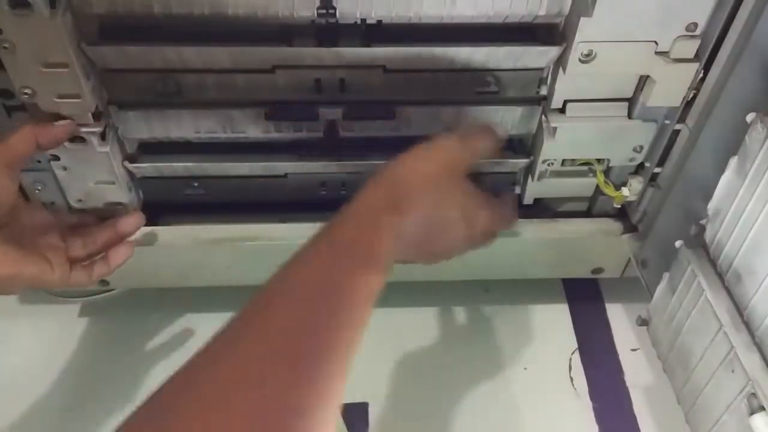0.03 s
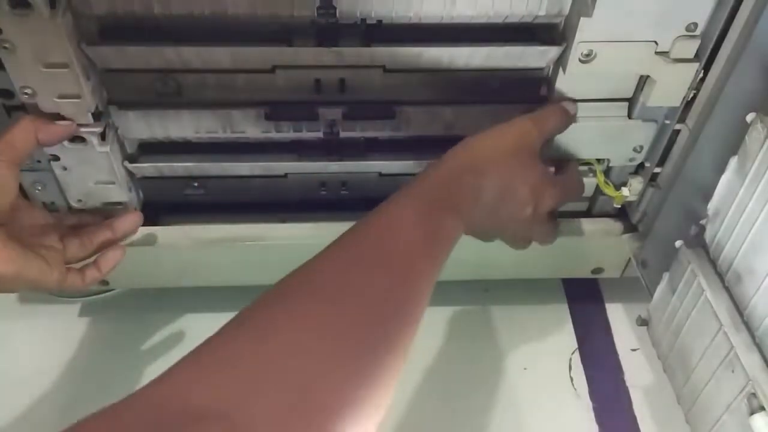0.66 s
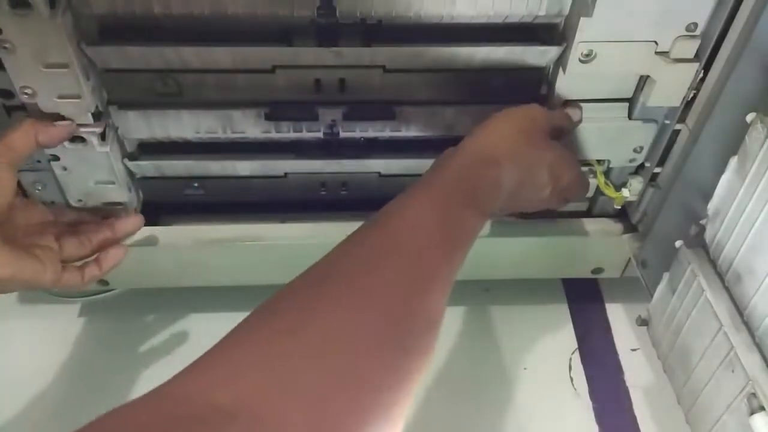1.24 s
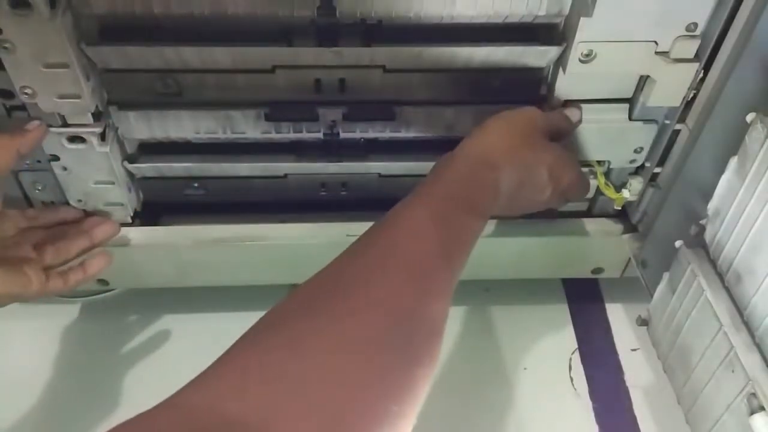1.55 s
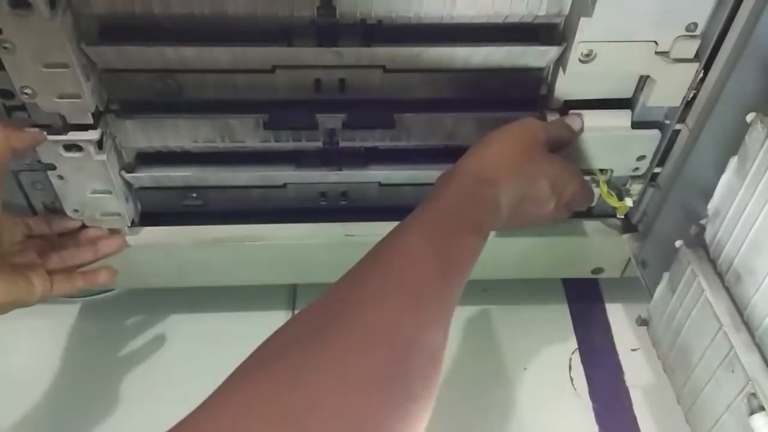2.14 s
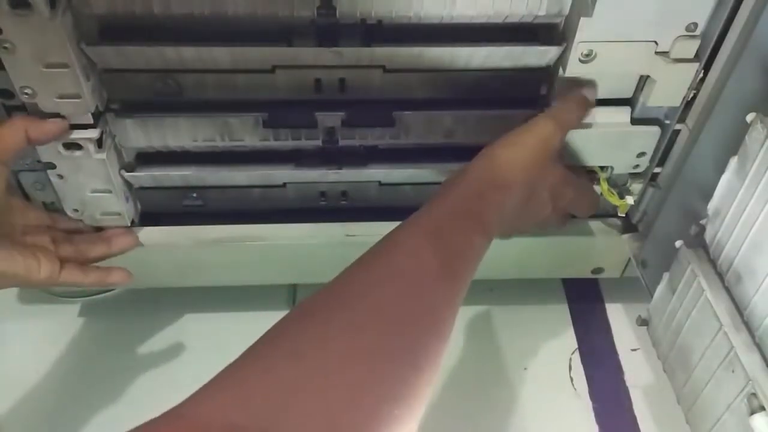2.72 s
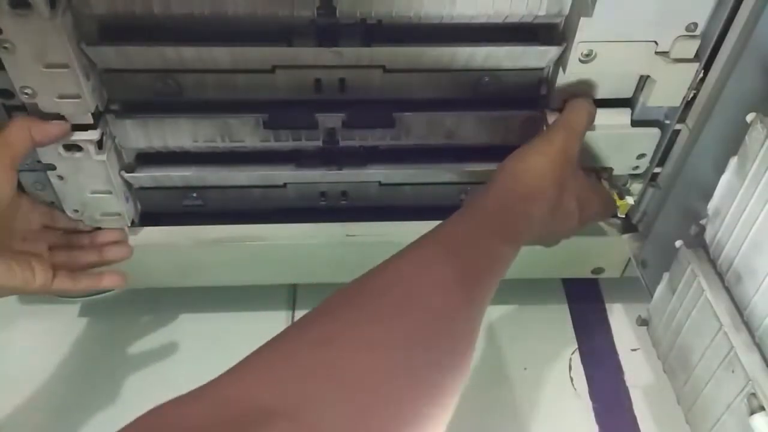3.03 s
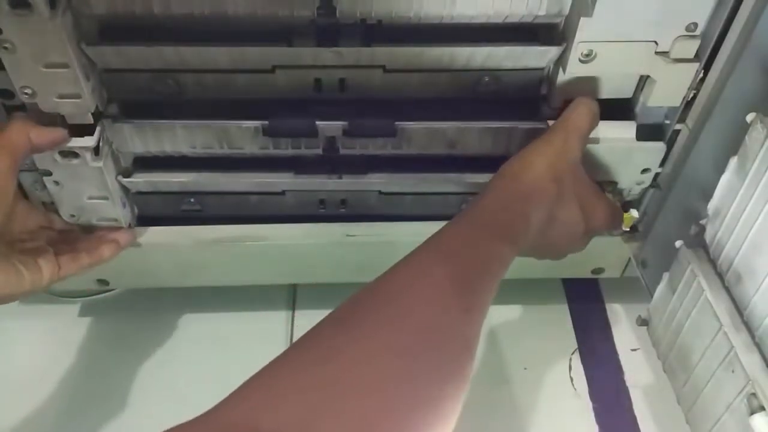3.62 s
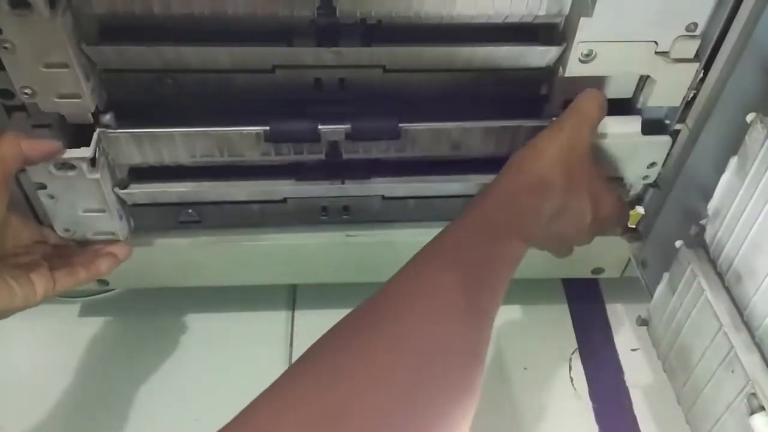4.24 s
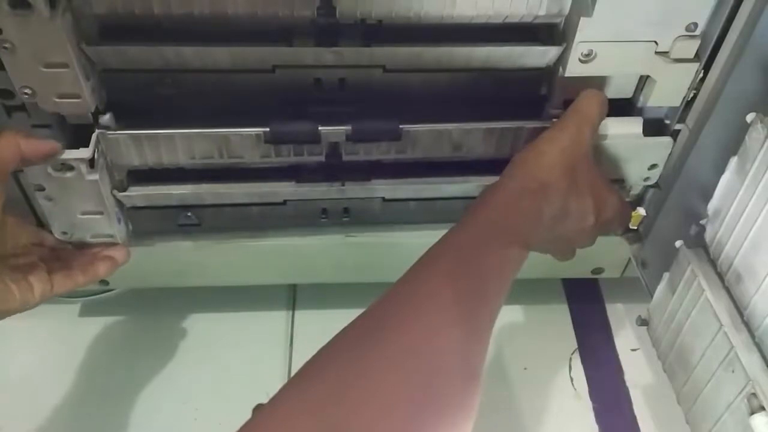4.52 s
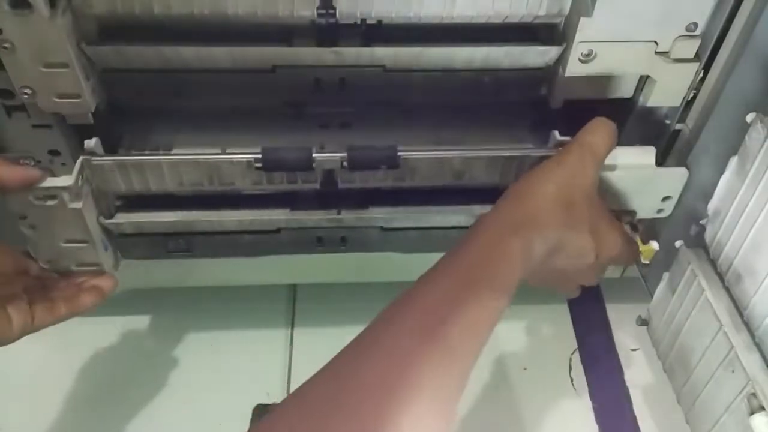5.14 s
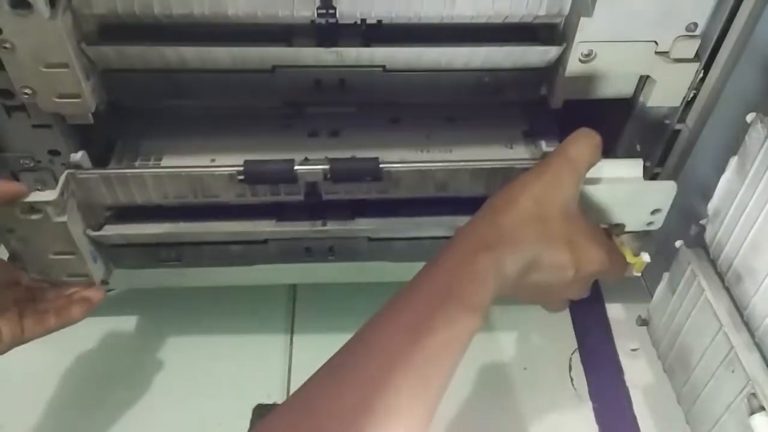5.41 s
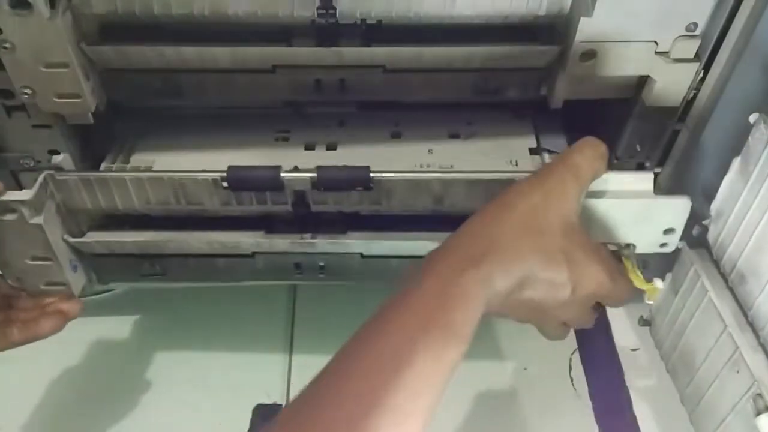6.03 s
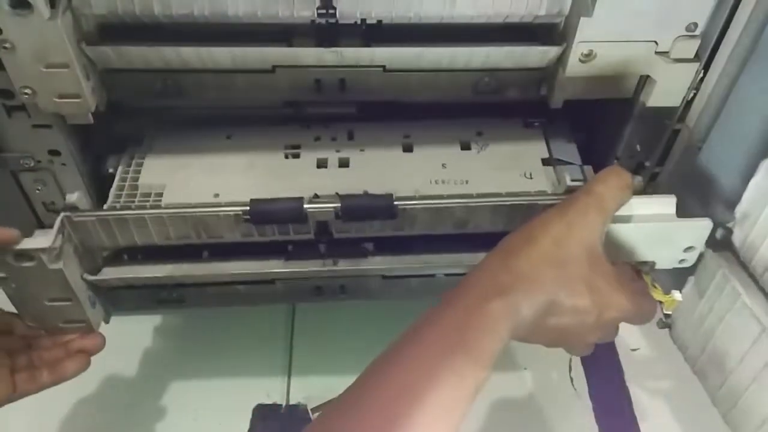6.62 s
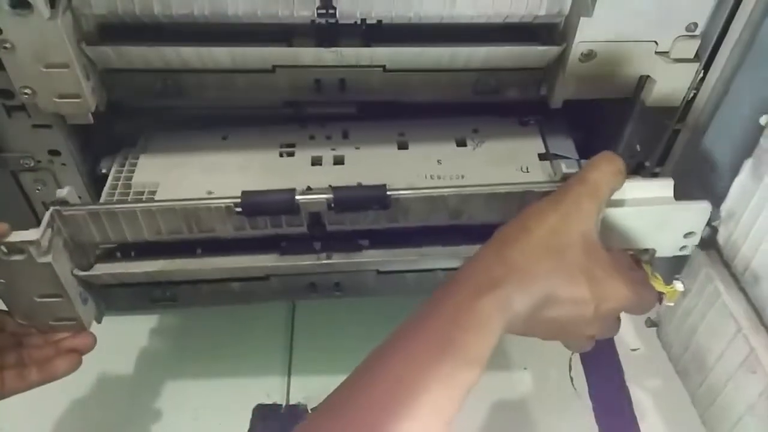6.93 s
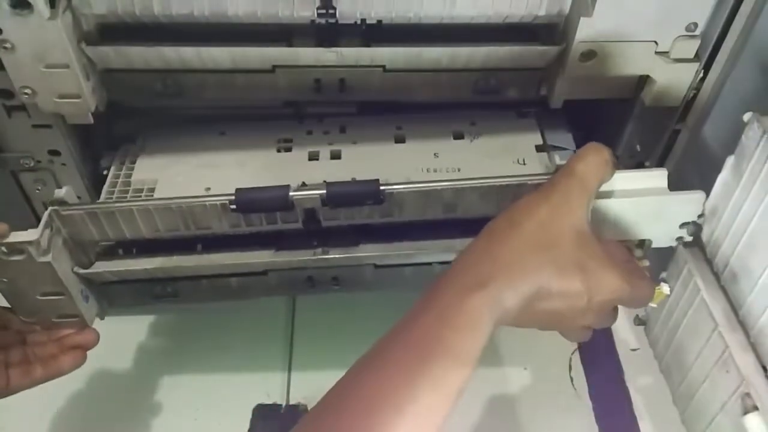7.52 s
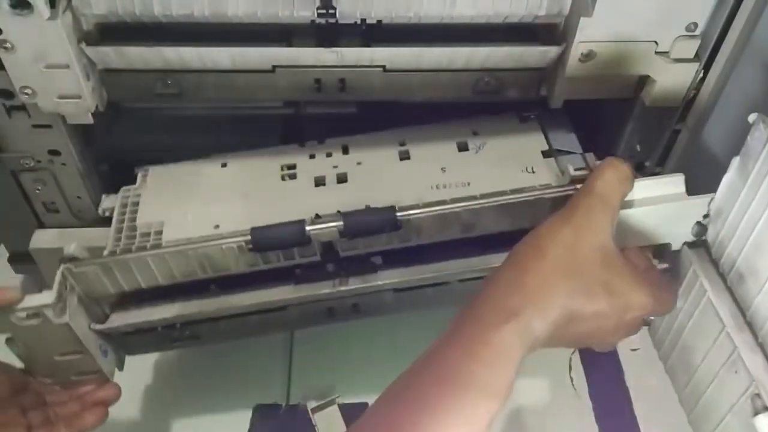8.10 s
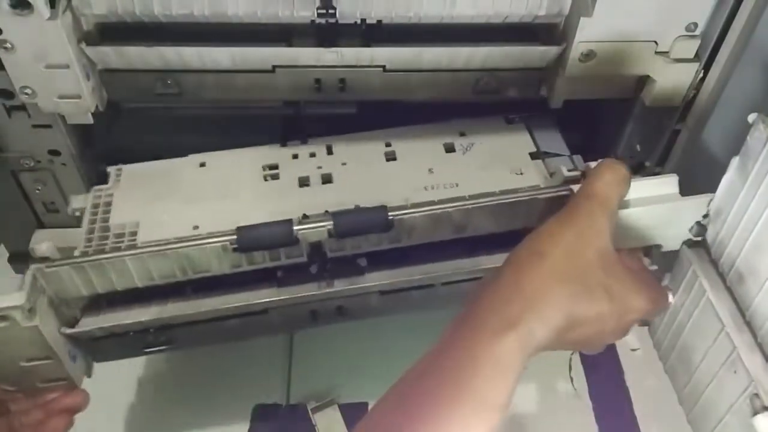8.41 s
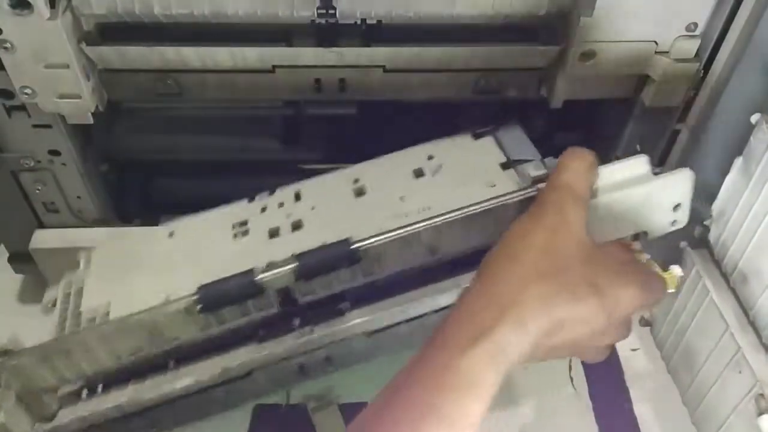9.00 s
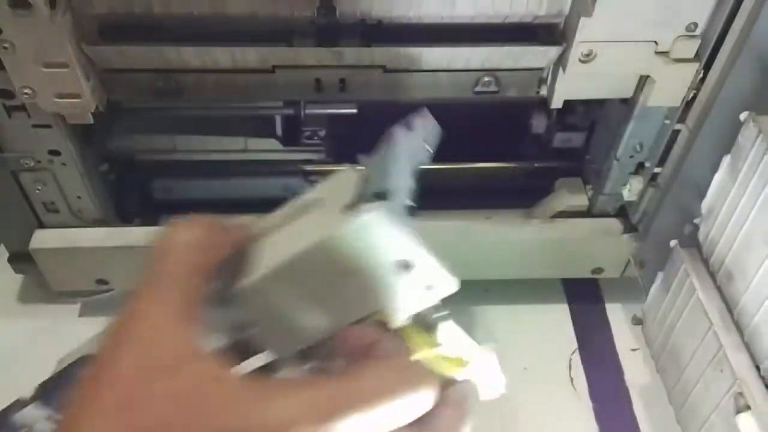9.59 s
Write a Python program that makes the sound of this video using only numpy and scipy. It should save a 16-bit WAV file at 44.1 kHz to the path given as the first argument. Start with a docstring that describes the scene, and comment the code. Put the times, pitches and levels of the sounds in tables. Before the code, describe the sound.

In a small hard room, hands unlatch a photocopier's paper feed unit with sharp plastic snaps. The unit judders along its rails, knocking against plastic panels and a steel frame that rings briefly, with small squeaks between the knocks. The clatter grows busier and hollower as the unit comes loose. Out in the street a motor vehicle draws near and passes toward the end. The handling is heard close, in stereo.

```python
"""Plastic catches snap close by in a small hard room: two hands unlatch a photocopier's paper feed unit.
Worked out of the open machine, the unit judders along its rails and knocks the panels and the steel
frame, which rings longest as the unit comes free. Between the knocks, guides stick, slip and squeak.
Out in the street a motor vehicle draws near and passes, with engine note, rumble and tyre hiss.
Heard on a closely spaced pair of microphones."""
import sys
import numpy as np
from scipy import signal
from scipy.fft import rfft, irfft
from scipy.io import wavfile

SR = 44100
rng = np.random.default_rng(int(sys.argv[2]) if len(sys.argv) > 2 else 0)


def write(x):
    x = np.atleast_2d(x).T
    wavfile.write(sys.argv[1], SR, np.round(np.clip(x, -1, 1) * 32767).astype(np.int16))


N = 429975
TIME = np.arange(N) / SR
HIT_SIZE = SR * 6 // 10
BAND_EDGES_HZ = np.concatenate([[25, 60, 105], np.geomspace(145, 17000, 28)])
BANDS_HZ = np.sqrt(BAND_EDGES_HZ[1:] * BAND_EDGES_HZ[:-1])


def from_db(db):
    return 10 ** (np.asarray(db) / 20)


def rms_one(x):
    return x / np.sqrt(np.mean(x ** 2) + 1e-20)


def at_time(rows, s):
    """Every column of a curve, read at the given times."""
    times, *columns = np.transpose(rows)
    return [np.interp(s, times, c) for c in columns]


def by_band(points):
    """A spectrum read at the band centres."""
    hz, value = np.transpose(points)
    return np.interp(np.log(BANDS_HZ), np.log(hz), value)


def drift(per_s):
    """A random wander; rms 1."""
    knots = rng.standard_normal(4000)
    return rms_one(np.interp(TIME * per_s, np.arange(len(knots)), knots))


# Colour of the left microphone against the right: frequency_hz, left_minus_right_db
MIC_TILT = [(60, 46.5), (150, -2.5), (500, -2.5), (1000, -0.5), (2000, -1), (4200, 3), (8000, 6.5),
            (13000, -1)]

def diffuse_bands(size, mic_spacing_s=0.00044):
    """Diffuse noise at the spaced pair, alike in the bass only: bands x 2 x size."""
    white, bands = rng.standard_normal((2, 2, size)), []
    for k, (hz, tilt_db) in enumerate(zip(BANDS_HZ, by_band(MIC_TILT))):
        bandpass = signal.butter(3, BAND_EDGES_HZ[k:k + 2], "band", fs=SR, output="sos")
        mid, side = signal.sosfilt(bandpass, white[k % 2])
        alike = np.sinc(2 * hz * mic_spacing_s)
        pair = np.sqrt(1 + alike) * mid + np.sqrt(1 - alike) * side * [[1], [-1]]
        bands.append(pair * from_db([[tilt_db / 2], [-tilt_db / 2]]))
    return np.array(bands, dtype=np.float32)


def coloured(bands, spectrum):
    """The bands mixed to a spectrum; rms 1."""
    return rms_one(np.tensordot(from_db(by_band(spectrum)).astype(np.float32), bands, 1))


# Room tone, all around the microphones: frequency_hz, density_db
ROOM_TONE = [(30, -42), (105, -51), (150, -2.5), (200, -7.5), (285, 1), (370, -4.5), (520, -12.5),
             (800, -15.5), (1300, -12), (2800, -18.5), (3800, -14), (4800, -19), (6100, -0.5), (7000, -21),
             (8400, -19), (13000, -19), (16000, -21)]

def room_air(bands, level_db=-53.5):
    """The steady air of the small room."""
    return from_db(level_db) * coloured(bands, ROOM_TONE)


# The engine's note as it reaches the room: time_s, level_db
ENGINE_LEVEL = [(0, -67), (3.0, -63.5), (4.6, -55.5), (7.7, -44), (8.6, -43), (9.7, -31.5)]
# Its partials: cycle_multiple, gain_db
ENGINE_ORDERS = [(4, -13), (5, -5.5), (6, -15.5), (8, -13.5)]

def engine(doppler, cycle_hz=44.4, wander=0.00412, waver_db=2.5):
    """Wavering harmonics of the engine cycle, sinking in pitch as the vehicle passes."""
    level_db, = at_time(ENGINE_LEVEL, TIME)
    phase = 2 * np.pi * np.cumsum(cycle_hz * doppler * (1 + wander * drift(8.4))) / SR
    return sum(from_db(level_db + db + waver_db * drift(4.8)) * np.sqrt(2) * np.sin(k * phase)
               for k, db in ENGINE_ORDERS)


# Rumble and tyres from the street, heard indoors: frequency_hz, density_db
RUMBLE_SPECTRUM = [(30, -55), (100, -32), (180, 2), (280, 6.5), (450, 6.5), (900, -8), (2500, -22.5)]
TYRE_SPECTRUM = [(100, -59), (250, -33), (550, -3.5), (1000, -4), (2800, -9.5), (4200, -13.5), (6500, -15),
                 (9000, -28.5), (16000, -38)]

def vehicle(bands, pass_s=8.9, speed_m_per_s=11, nearest_m=7.74, screen_db_per_m=0.5):
    """A steady drive past, louder and brighter up close; buildings screen it further up the street."""
    along_m = speed_m_per_s * (TIME - pass_s)
    distance_m = np.hypot(nearest_m, along_m)
    near_db = 20 * np.log10(nearest_m / distance_m) - screen_db_per_m * (distance_m - nearest_m)
    doppler = 1 / (1 + speed_m_per_s * along_m / distance_m / 343)
    note = engine(doppler)
    rumble = from_db(-38 + near_db) * np.roll(coloured(bands, RUMBLE_SPECTRUM), N // 3, axis=1)
    tyre_db = -33.5 + near_db + 0.9 * drift(22)
    tyres = from_db(tyre_db) * np.roll(coloured(bands, TYRE_SPECTRUM), N // 2, axis=1)
    roar = signal.sosfiltfilt(signal.butter(4, 3400, fs=SR, output="sos"), tyres)
    hiss = (tyres - roar) * from_db(0.24 * near_db)   # fades faster with distance
    return note + rumble + roar + hiss


# Guides rubbing inside the copier: start_s, length_s, pitch_hz, width_hz, rise_share, level_db
GUIDE_SQUEAKS = [(1.095, .086, 5650, 490, 0.025, -45.5), (1.978, 0.046, 418, 90, .02, -43),
                 (2.674, 0.055, 1680, 170, 0.014, -51.5), (3.354, 0.11, 1007, 300, 0.041, -45.5),
                 (4.44, 0.058, 3100, 130, .02, -51), (4.528, 0.028, 2440, 220, 0.036, -48),
                 (4.544, 0.041, 2880, 200, .03, -50), (4.587, 0.04, 3280, 190, 0.03, -50),
                 (4.565, 0.088, 1810, 400, 0.047, -50.5), (4.874, 0.27, 3340, 120, .02, -57.5),
                 (5.934, 0.082, 5600, 2200, 0.025, -40), (7.457, 0.06, 610, 111, 0.0062, -38),
                 (8.263, 0.08, 595, 143, 0.038, -35.5), (8.542, 0.06, 745, 190, 0, -32.5),
                 (8.608, 0.36, 953, 260, 0.017, -39), (9.639, .15, 782, 161, 0.034, -38),
                 (9.598, .29, 2725, 60, 0.0059, -42)]
# The unit groans over the edge of the bay: slip_rate_multiple, level_db
GROAN_PARTIALS = [(2, -35), (3, -26), (4, -35.5)]
GROAN_START_S, GROAN_LENGTH_S, GROAN_SLIP_HZ, GROAN_WIDTH_HZ = 8.755, 0.092, 142.4, 16

def squeaks(evenness=0.66, side_share=0.67, stick_db=4.0):
    """Stick-slip friction drives narrow resonances, which chirp upward with the pressure of the stroke."""
    out = np.zeros((2, N + HIT_SIZE))
    groan = [(GROAN_START_S, GROAN_LENGTH_S, k * GROAN_SLIP_HZ, GROAN_WIDTH_HZ, 0, db)
             for k, db in GROAN_PARTIALS]
    for start_s, length_s, pitch_hz, width_hz, rise, level_db in GUIDE_SQUEAKS + groan:
        size, at = int(min(length_s * SR, HIT_SIZE // 2)), int(start_s * SR)
        pole = np.exp(-np.pi * width_hz / SR)
        drive = rng.standard_normal((2, HIT_SIZE)) + 1j * rng.standard_normal((2, HIT_SIZE))
        swing = signal.lfilter([1], [1, -2 * pole, pole * pole], drive)[:, -size:]
        swing /= np.abs(swing) ** evenness   # friction steadies the swing's height
        phase = 2 * np.pi * np.cumsum(pitch_hz * (1 + rise * np.linspace(-.5, .5, size))) / SR
        mid, side = (rms_one(v) for v in (swing * np.exp(1j * phase)).real)
        pair = mid + side_share * side * [[1], [-1]]
        squeak = rms_one(pair * from_db(stick_db * drift(82)[:size]))
        stroke = np.interp(np.linspace(0, 1, size), [0, .1, .6, 1], [0, 1, 1, 0])   # quick grip, slow end
        out[:, at:at + size] += from_db(level_db) * stroke * squeak
    return out[:, :N]


# Modes of the copier's steel frame: pitch_hz, gain_db, t60_s
STEEL_FRAME = [(299.4, -10, .3), (414, -8.5, 0.18), (498, -11.5, 0.42), (563, -3.5, 0.26), (686, -4, 0.27),
               (774, -5.5, 0.19), (912, -2, 0.29), (1076, -3.5, 0.12), (1184, -9, 0.099), (1356, -10, 0.26),
               (1513, -3, 0.24), (1716, -4.5, 0.19), (1883, -8, 0.17), (2428, -6.5, 0.29), (2650, -6, 0.23),
               (3120, -9, .09), (3500, -1, 0.18), (3540, -12.5, 0.17), (4190, -12, 0.23), (4520, -7, 0.11),
               (4670, -13, 0.12), (4830, -9, 0.098), (6450, -5, .24), (7100, -15, 0.18)]
MODE_HZ, MODE_DB, MODE_T60_S = np.transpose(STEEL_FRAME)

def frame_modes():
    """The free ring of each mode, as a dying phasor of energy 1."""
    modes = np.exp((2j * np.pi * MODE_HZ - np.log(1000) / MODE_T60_S)[:, None] * TIME[:HIT_SIZE])
    return (modes / np.linalg.norm(modes, axis=1, keepdims=True)).astype(np.complex64)


def frame_ring(modes, strength_db):
    """The struck frame: each mode reaches each microphone in a random phase."""
    strike = from_db(strength_db) * np.exp(2j * np.pi * rng.random((2, len(MODE_HZ))))
    return (strike.astype(np.complex64) @ modes).real


# The hands pull the unit along its rails: start_s, hold_s, friction_db
HAND_PULLS = [(1.966, 0.11, -48.5), (2.675, 0.35, -52.5), (3.485, 0.37, -47.5), (4.36, 0.16, -45.5),
              (4.87, 0.16, -45), (5.38, 0.35, -48.5), (5.855, 0.15, -37), (6.62, 0.67, -49),
              (7.202, 0.16, -43), (7.547, 0.31, -45), (8.01, 0.45, -41), (8.627, 0.16, -34.5),
              (9.003, 0.053, -37.5), (9.617, .12, -40)]

def friction(attack_s=0.15, release_s=0.21, grip_db=-61.5):
    """Each pull swells, holds and lets go, over the light rub of the grip."""
    pulls = sum(from_db(db) * np.interp(TIME - s, [-attack_s, 0, hold_s, hold_s + release_s], [0, 1, 1, 0])
                for s, hold_s, db in HAND_PULLS)
    return np.hypot(from_db(grip_db), pulls)


# The rails, heard close by through the panels: frequency_hz, density_db
RAIL_SPECTRUM = [(100, -24), (250, 13), (600, 9.5), (1200, 6), (3200, 3), (7000, -2), (10000, -16.5),
                 (16000, -19)]

def sliding(slips_per_s=260, spread_db=5, t60_s=0.21, judder_db=2.5, frame_db=-4):
    """Uneven slips on the rails, each ringing briefly in the panels and the hollow frame."""
    slipping = rng.random(N) < slips_per_s / SR
    slips = slipping * from_db(spread_db * np.clip(rng.standard_normal(N), -2, 2)) * rng.choice([-1, 1], N)
    decay = np.exp(-np.log(1000) * TIME[:HIT_SIZE] / t60_s)
    panels = rms_one(coloured(diffuse_bands(HIT_SIZE), RAIL_SPECTRUM) * decay)
    frame = frame_ring(frame_modes(), MODE_DB + np.interp(MODE_HZ, BANDS_HZ, by_band(RAIL_SPECTRUM)))
    ring = rms_one(panels + from_db(frame_db) * rms_one(frame)) / np.sqrt(HIT_SIZE)
    force = rms_one(slips) * friction() * from_db(judder_db * np.tanh(drift(30)))
    return signal.fftconvolve(force[None], ring, axes=1)[:, :N]


def chatter(length_s, impacts_per_s=900, spread_db=5.0, grain=0.57, first_touch=0.59):
    """Force of a contact: a first touch, then uneven micro-impacts growing until the parts seat."""
    size = int(np.clip(length_s * SR, 8, SR // 20))
    touching = rng.random(HIT_SIZE) < impacts_per_s / SR
    impacts = touching * from_db(spread_db * rng.standard_normal(HIT_SIZE)) * rng.choice([-1, 1], HIT_SIZE)
    force = grain * impacts[:size] * np.linspace(.5, .66, size)
    force[0] = first_touch
    return force / np.linalg.norm(force)


def crack(gains, left_lag_ms, size=1024):
    """The direct, minimum-phase pulse of a contact, reaching one microphone before the other."""
    hz = np.arange(size // 2 + 1) * SR / size
    cepstrum = irfft(np.interp(hz, BANDS_HZ, np.log(gains)))
    pulse = np.exp(rfft(2 * cepstrum[:size // 2] * (np.arange(size // 2) > 0), size))
    delays_s = np.array([[max(left_lag_ms, 0)], [max(-left_lag_ms, 0)]]) / 1000
    pair = rms_one(irfft(pulse * np.exp(-2j * np.pi * hz * delays_s))) / np.sqrt(size)
    return np.pad(pair, [(0, 0), (0, HIT_SIZE - size)])


def first_ring(energy, chatter_s, t60_s=0.093, snap_s=0.003, snap_db=6.5):
    """Envelope of the plastic panels' quick ring: louder and shorter after a clean snap."""
    snap = np.exp(-chatter_s / snap_s)
    kept_per_sample = np.exp(-2 * np.log(1000) / (t60_s * (1 - snap / 2) * SR))
    stored = signal.lfilter([1], [1, -kept_per_sample], energy + 1e-18)
    return (from_db(-1.5 + snap_db * snap) * np.sqrt(stored)).astype(np.float32)


# How long the panels and the hard room hold a knock: frequency_hz, t60_s
KNOCK_DECAY = [(60, 0.14), (250, 0.6), (900, 0.34), (3500, 0.28), (7000, 0.25), (14000, 0.25)]

def panels_and_room(noise, gains, early, build, decay_factor):
    """Dense resonances as noise dying band by band: the quick first ring, then the tail."""
    fading = (-np.log(1000) * TIME[:HIT_SIZE] / by_band(KNOCK_DECAY)[:, None]).astype(np.float32)
    envelope = np.exp(fading / np.float32(decay_factor)) * build + early
    envelope *= (gains / np.linalg.norm(envelope, axis=1))[:, None]
    at = rng.integers(HIT_SIZE // 2, 3 * HIT_SIZE)
    return rms_one(np.einsum("bct,bt->ct", noise[:, :, at:at + HIT_SIZE], envelope)) / np.sqrt(HIT_SIZE)


def bay_echoes(hit, count=4):
    """The walls of the open bay throw back quick echoes that make the knock hollow."""
    out = hit.copy()
    for lag in (rng.uniform(.0008, .007, count) * SR).astype(int):
        out[:, lag:] += .21 * rng.choice([-1, 1]) * hit[:, :-lag]
    return out


def struck_spot(hit, hz, gain_db=1, q=8.2):
    """The stretch of panel under the blow adds a resonance of its own."""
    b, a = signal.iirpeak(hz, q, fs=SR)
    return hit + from_db(gain_db) * signal.lfilter(b, a, hit)


def rebounds(contacts, heavy_db=-13.5, delay_s=0.046, chatter_s=0.01, loss_db=15, brighter_db=13):
    """After a heavy blow the unit bounces once, weaker and brighter."""
    return [(s + delay_s, chatter_s, level_db - loss_db, thud_db, bright_db + brighter_db, hz)
            for s, _, level_db, thud_db, bright_db, hz in contacts if level_db > heavy_db]


# A knock on the plastic panels: frequency_hz, density_db
PANEL_SPECTRUM = [(18, -52), (30, -42), (121, -25), (189, -8.5), (295, -5), (426, -4), (486, -2.5),
                  (666, -1.5), (1250, -1), (3770, -7), (4530, -6), (7090, -6.5), (9220, -14.5),
                  (14800, -16.5), (16000, -24.5)]
# The unit rings longest as it comes loose: time_s, decay_factor, frame_gain_db
LOOSENESS = [(1.0, 1.05, -2), (4.7, 1.05, -4.5), (5.8, 1.07, -2.5), (7.1, 1.78, 1), (7.9, 0.72, -18)]
# Where the knocks sit between the microphones: time_s, left_lag_ms, left_minus_right_db
KNOCK_BEARING = [(1.0, 0.017, 1.5), (4.8, 0, 1), (5.8, -0.362, 1.5), (9.0, -0.35, 1)]
# Plastic and metal meet, close by: start_s, chatter_s, level_db, thud_db, bright_db, spot_hz
PART_CONTACTS = [(0.677, 0.041, -46, -18, -8, 1720), (1.026, 0.002, -34.5, -11.5, -11, 4640),
                 (1.1475, 0.004, -13.2, -5, 6, 4400), (1.153, 0.0037, -13, -14, 0, 4660),
                 (1.173, 0.004, -15, -10.5, 0, 4500), (1.309, 0.0009, -21.5, -9.5, -4, 4600),
                 (1.34, 0.002, -29.5, -7, -15, 1190), (1.371, 0.0098, -31, -11, -11, 1200),
                 (1.4, .001, -30.5, -8, -6, 4500), (1.682, 0.0042, -44, -15, -7, 5440),
                 (1.969, 0.0073, -41.5, 12, 9, 5500), (2.071, 0.022, -33.5, 3, 3, 1020),
                 (2.097, 0.0096, -22, -10, -4, 1580), (2.112, 0.015, -19.5, 0, -5.5, 1400),
                 (2.202, 0.0056, -41.5, -12, 1, 1490), (2.42, 0.003, -39.5, -4, 6, 5430),
                 (2.58, 0.013, -33.5, 3, 2.5, 980), (2.963, 0.008, -41.5, 8, -24, 880),
                 (3.232, 0.0038, -38, 0, -4, 1100), (3.396, 0.03, -24, -3, 1, 1170),
                 (3.434, 0.012, -23, -2, 3, 2940), (3.452, 0.028, -23, 3.5, 6.5, 3720),
                 (3.486, 0.03, -27, 4.5, -1, 1130), (3.769, 0.0062, -32.5, 9, 8, 4460),
                 (3.792, 0.0036, -19.5, -5.5, 6, 870), (3.951, 0.016, -38.5, 7.5, -4, 650),
                 (4.057, 0.0057, -29, 7.5, 1.5, 810), (4.123, 0.0031, -41.5, -9, 0, 1510),
                 (4.322, 0.027, -43.5, 5, -2, 3000), (4.42, 0.015, -38, 8, -11, 865),
                 (4.495, 0.008, -32.5, 2, -12, 1670), (4.699, 0.006, -22, 1, 0, 3500),
                 (4.705, 0.0035, -10.5, -10.5, -4, 3600), (4.717, 0.0023, -11.5, -7.5, -8, 1770),
                 (4.727, 0.0036, -14.5, -4, -22, 1050), (5.115, 0.017, -33, 11, 2, 865),
                 (5.147, 0.0038, -20, -1.5, 1.5, 1670), (5.349, 0.044, -31.5, -1.5, -10.5, 1450),
                 (5.433, 0.031, -32, 1.5, -12, 1140), (5.771, .006, -30.5, -6, 6, 5000),
                 (5.783, 0.0053, -22.5, -1, 3, 1500), (5.79, 0.016, -16, 5, -8, 574),
                 (5.849, 0.0094, -28, 0, -1, 4500), (6.01, 0.0037, -24.5, 3, 4, 5200),
                 (6.037, 0.012, -22.5, 0, 0, 2450), (6.048, .004, -20.5, -1, -1, 5260),
                 (6.282, 0.014, -30.5, -3, -12, 1400), (6.309, 0.015, -22, 4, -4, 1510),
                 (6.325, 0.0068, -12.5, 4, -6, 725), (6.339, 0.014, -15.5, 3, -2, 1470),
                 (6.373, 0.011, -19.5, -0.5, -9, 2920), (6.491, 0.015, -30, 5, -7, 1500),
                 (6.525, 0.011, -26.5, 5, -19, 695), (6.694, 0.016, -25.5, 3, -16, 510),
                 (6.847, 0.0018, -37, 5, 2, 3300), (6.935, 0.004, -25.5, 10, -4.5, 584),
                 (7.019, 0.035, -23, 5, -9, 520), (7.05, 0.006, -13, 1.5, -4, 910),
                 (7.064, 0.03, -15, 2, -17, 670), (7.193, 0.0032, -30, 13, 4, 666),
                 (7.865, 0.016, -28.5, 8, -20, 654), (7.8845, 0.00079, -21.5, 10, 6.5, 530),
                 (7.886, 0.00091, -23.5, -1, 7, 3150), (8.257, 0.0022, -28, 17, -14, 585),
                 (8.418, .003, -30, 16, 0, 810), (8.544, 0.0023, -30, 10.5, 2, 744),
                 (8.661, 0.022, -29, 13, -7, 560), (8.797, 0.03, -26, 11, -9, 420),
                 (9.589, 0.0046, -34, 12, -16, 880)]

def knocks(crack_db=-8, frame_db=-7, mode_spread_db=4.0, spread_s=0.00089):
    """Each contact cracks, spreads through the panels into the room and sets the steel frame ringing."""
    out = np.zeros((2, N + HIT_SIZE))
    noise, modes = diffuse_bands(4 * HIT_SIZE), frame_modes()
    onset = 1 - np.exp(-TIME[:HIT_SIZE] / spread_s)
    for start_s, chatter_s, level_db, thud_db, bright_db, hz in PART_CONTACTS + rebounds(PART_CONTACTS):
        lag_ms, pan_db = at_time(KNOCK_BEARING, start_s)
        decay_factor, loose_db = at_time(LOOSENESS, start_s)
        # a heavy contact feeds the low panel modes, a hard one the top
        colour_db = by_band([(90, -4), (240, thud_db), (550, thud_db), (3300, 0.021), (11000, bright_db)])
        gains = from_db(by_band(PANEL_SPECTRUM) + colour_db)
        force = chatter(chatter_s)
        energy = np.pad(force ** 2, (0, HIT_SIZE - len(force)))
        build = np.sqrt(np.cumsum(energy)).astype(np.float32)   # a snap starts at once, a grind builds up
        body = panels_and_room(noise, gains, first_ring(energy, chatter_s), build, decay_factor)
        # every blow shares itself out differently; modes near the spot's resonance ring harder
        strength_db = MODE_DB + np.interp(MODE_HZ, BANDS_HZ, colour_db) - max(thud_db, 0) / 2
        strength_db += mode_spread_db * rng.uniform(-3.9, 1, len(MODE_HZ))
        nearby_db = 10 * np.exp(-(np.log2(MODE_HZ / hz) / 0.1) ** 2)
        ring = build * frame_ring(modes, strength_db + nearby_db + frame_db + loose_db)
        direct = signal.fftconvolve(crack(gains, lag_ms), force[None], axes=1)[:, :HIT_SIZE]
        hit = (struck_spot(bay_echoes(body + from_db(crack_db) * direct), hz) + ring) * onset
        hit *= np.sqrt(2 * .02 * SR / np.sum(hit ** 2))   # level_db is the energy spread over 20 ms
        at = int(start_s * SR)
        out[:, at:at + HIT_SIZE] += hit * from_db(level_db + np.array([[pan_db], [-pan_db]]) / 2)
    return out[:, :N]


def scene():
    """The copier in front, the room around it and the street outside."""
    copier = knocks() + sliding() + squeaks()
    bands = diffuse_bands(N)
    return room_air(bands) + vehicle(bands) + copier


def record(dry, cutoff_hz=16700):
    """The microphone input clips any snap above full scale; the top treble is cut."""
    lowpass = signal.cheby2(16, 70, cutoff_hz, fs=SR, output="sos")
    return signal.sosfilt(lowpass, np.clip(dry, -1, 1))


dry = scene()
out = record(dry)
write(out)
```